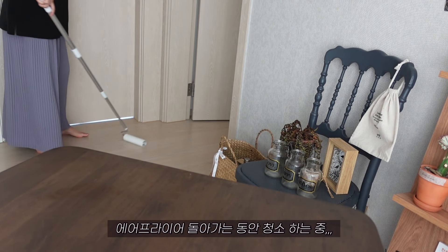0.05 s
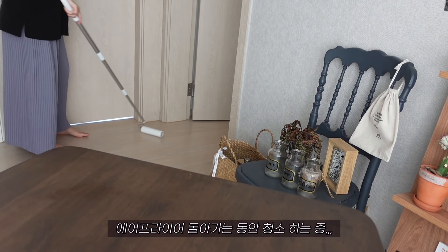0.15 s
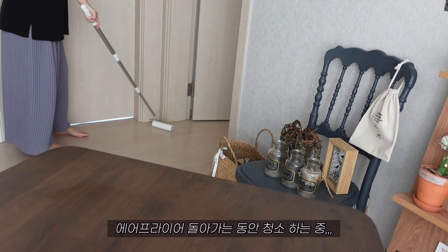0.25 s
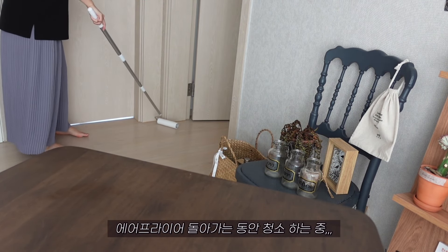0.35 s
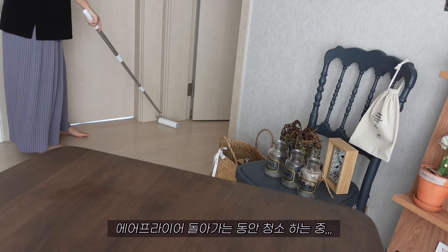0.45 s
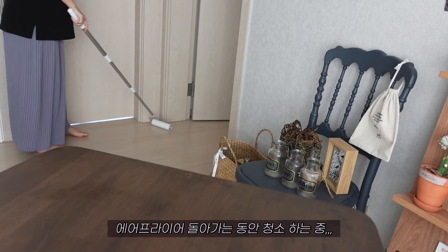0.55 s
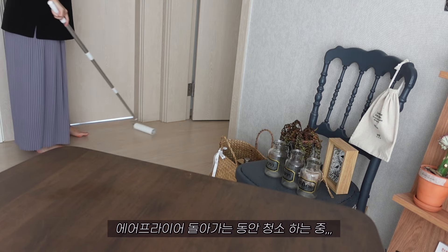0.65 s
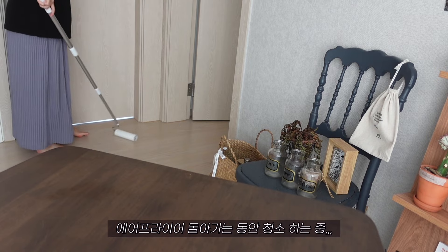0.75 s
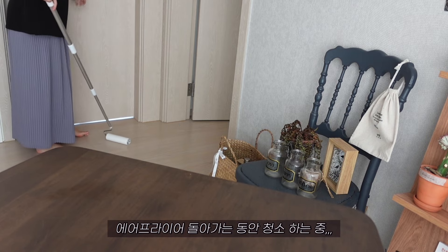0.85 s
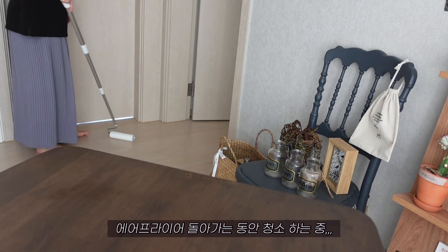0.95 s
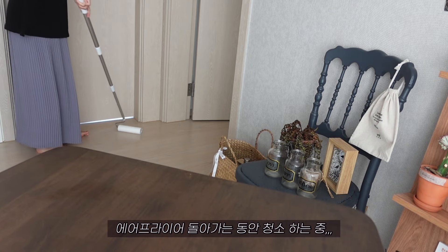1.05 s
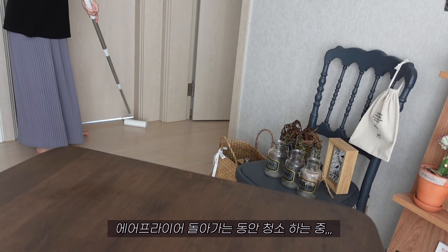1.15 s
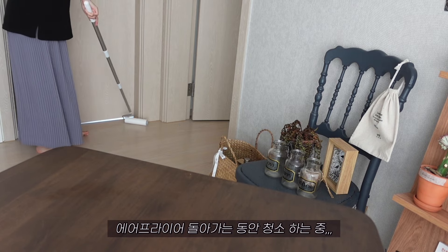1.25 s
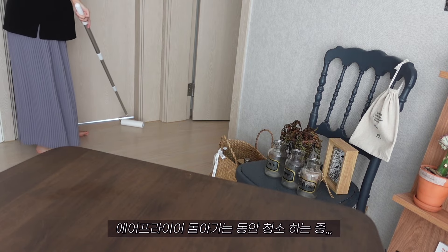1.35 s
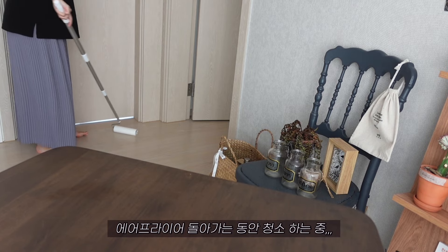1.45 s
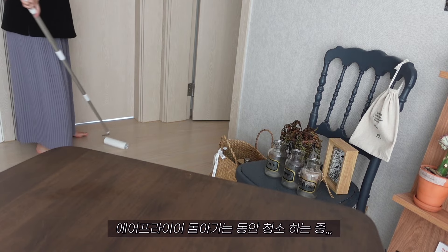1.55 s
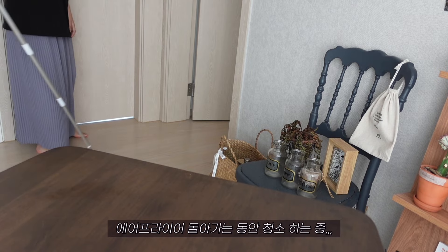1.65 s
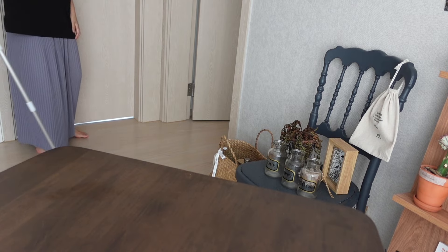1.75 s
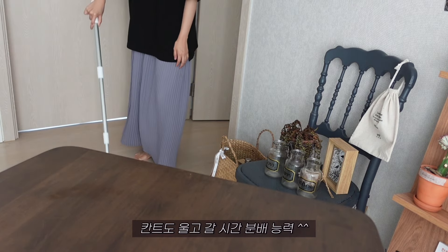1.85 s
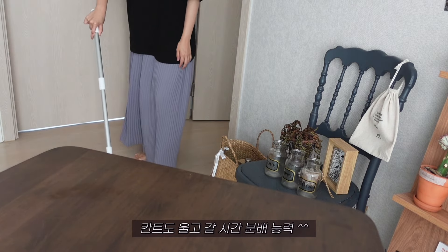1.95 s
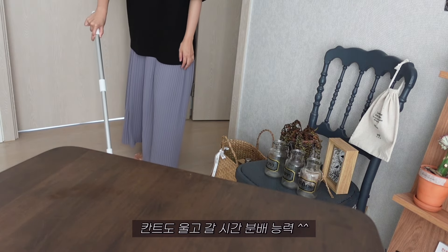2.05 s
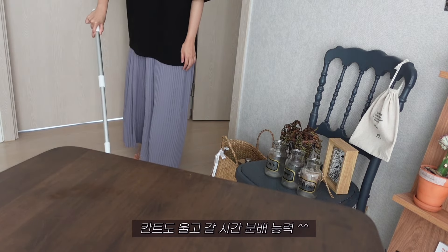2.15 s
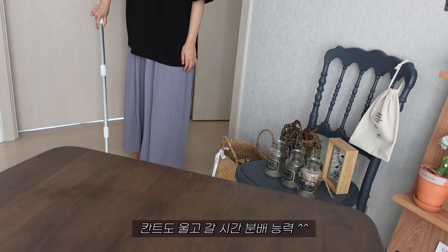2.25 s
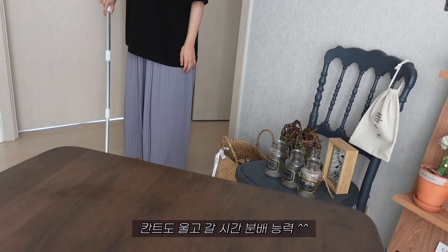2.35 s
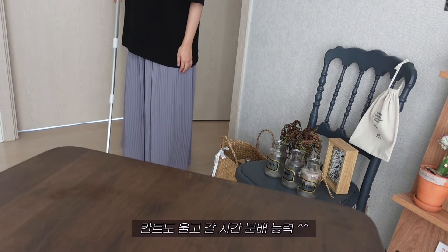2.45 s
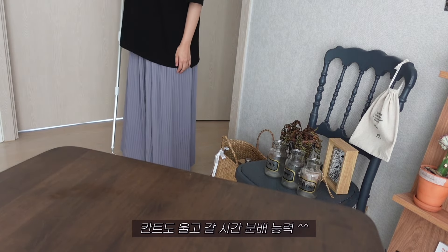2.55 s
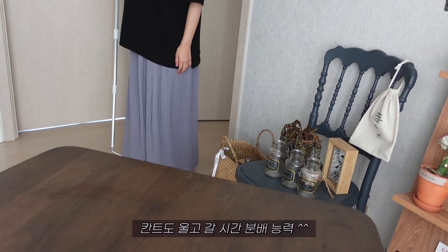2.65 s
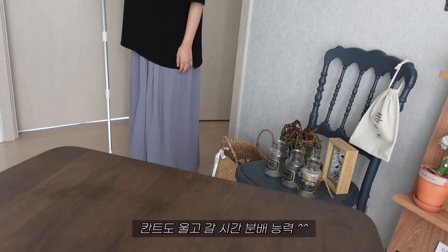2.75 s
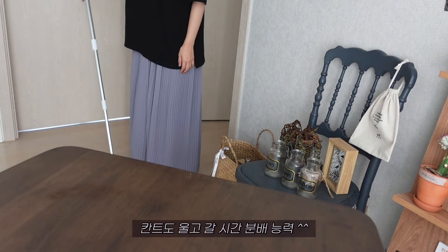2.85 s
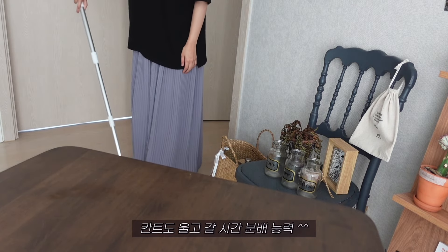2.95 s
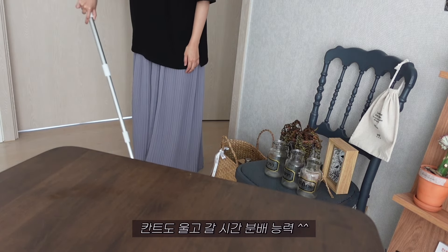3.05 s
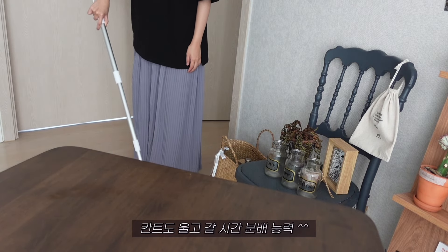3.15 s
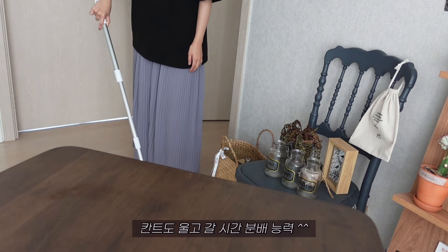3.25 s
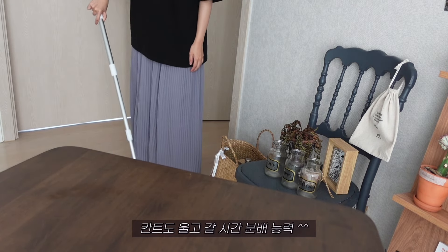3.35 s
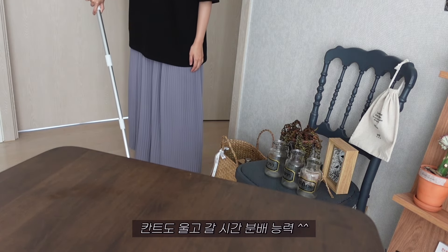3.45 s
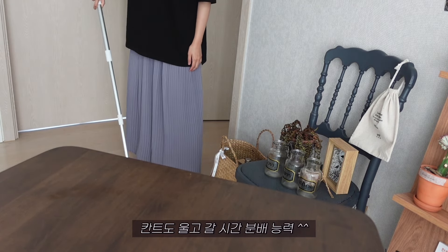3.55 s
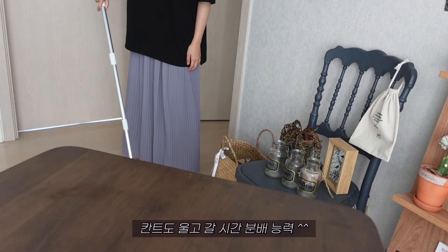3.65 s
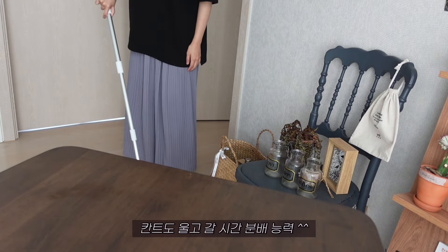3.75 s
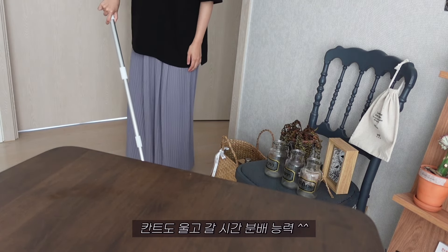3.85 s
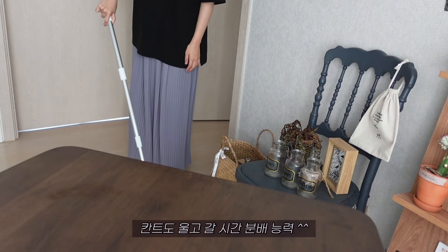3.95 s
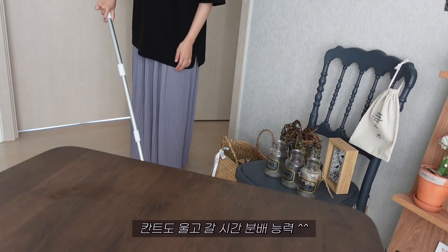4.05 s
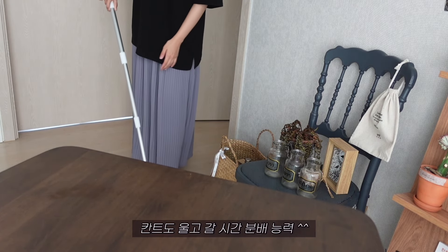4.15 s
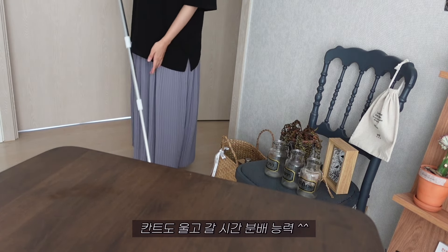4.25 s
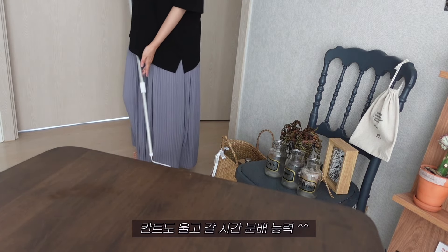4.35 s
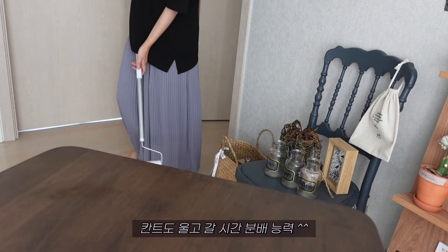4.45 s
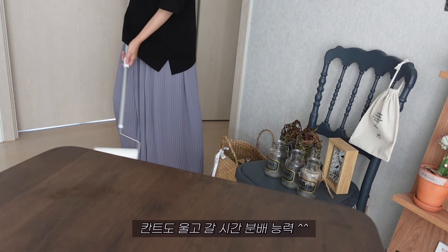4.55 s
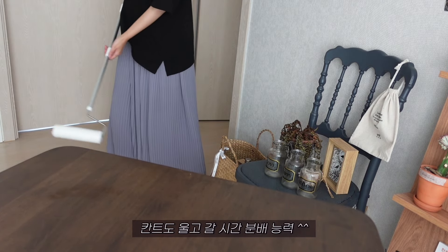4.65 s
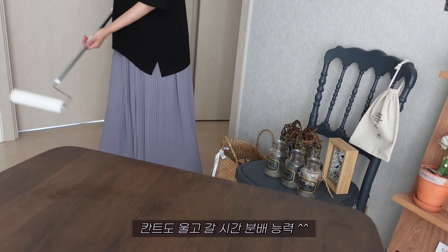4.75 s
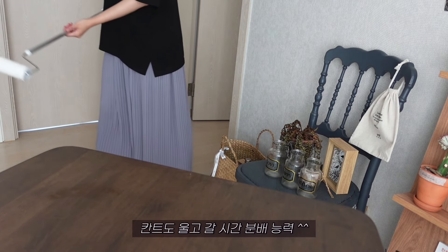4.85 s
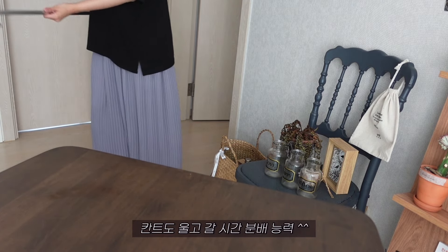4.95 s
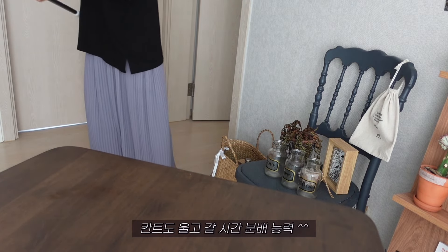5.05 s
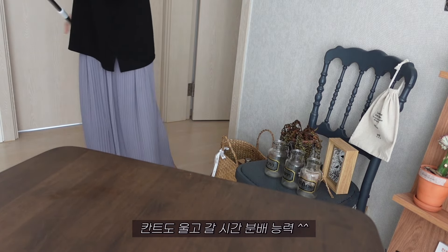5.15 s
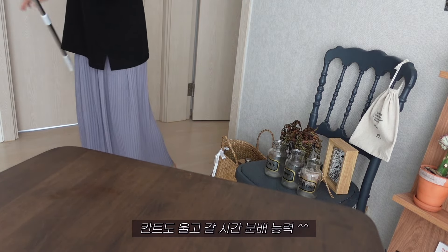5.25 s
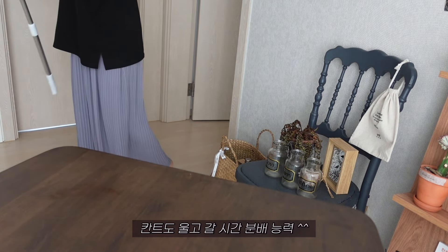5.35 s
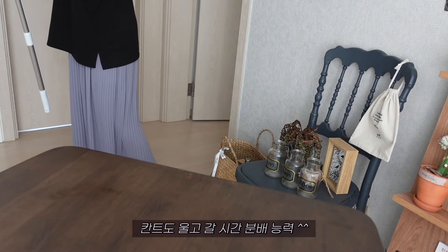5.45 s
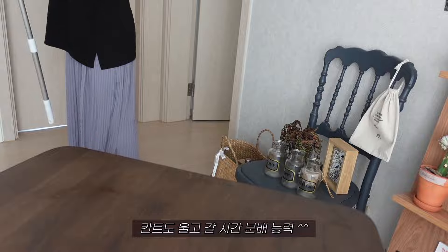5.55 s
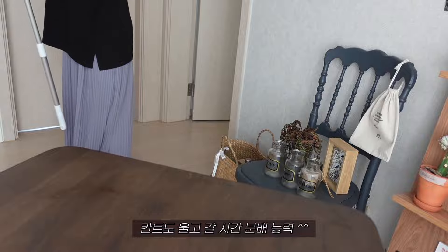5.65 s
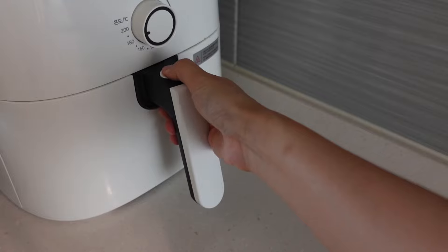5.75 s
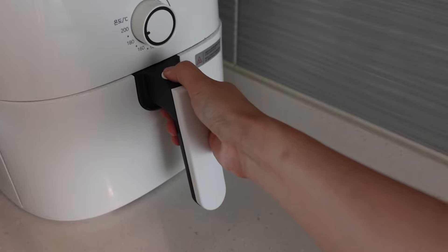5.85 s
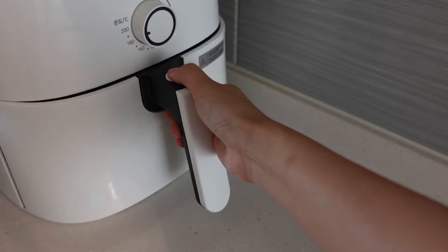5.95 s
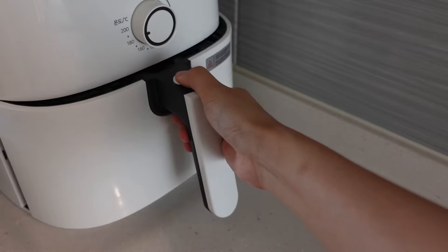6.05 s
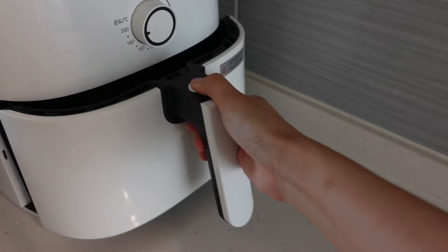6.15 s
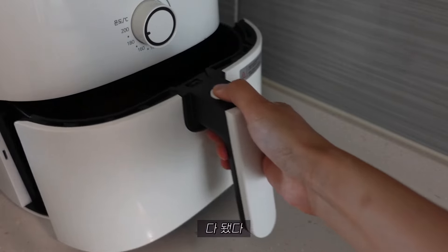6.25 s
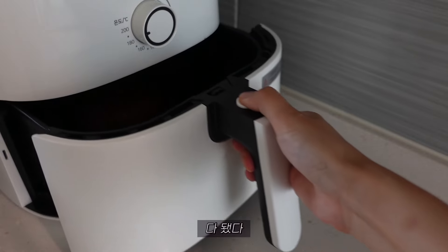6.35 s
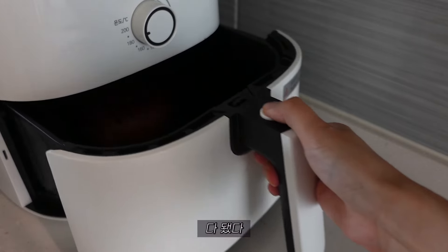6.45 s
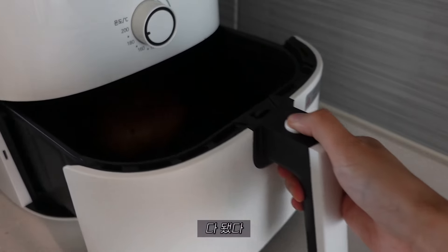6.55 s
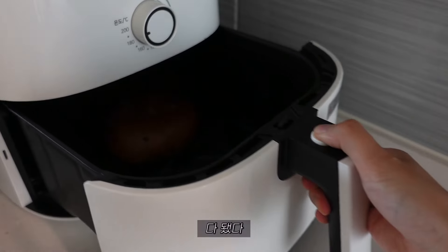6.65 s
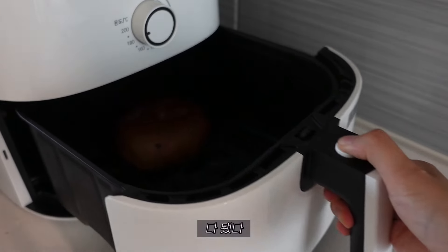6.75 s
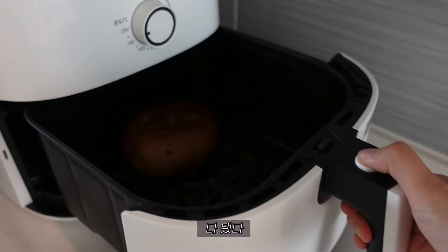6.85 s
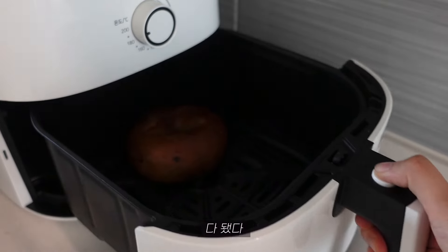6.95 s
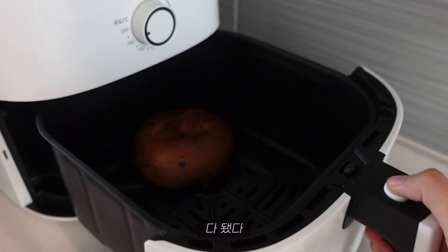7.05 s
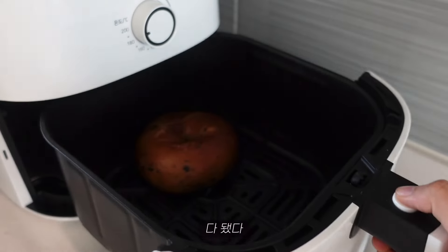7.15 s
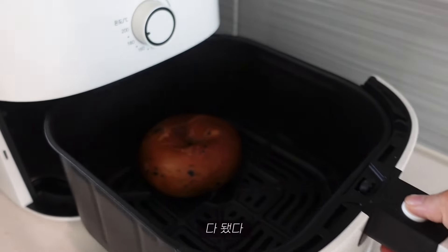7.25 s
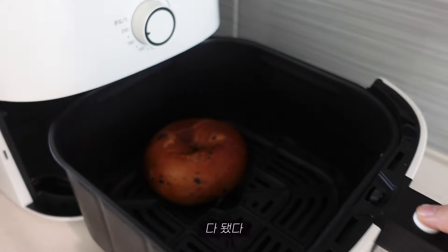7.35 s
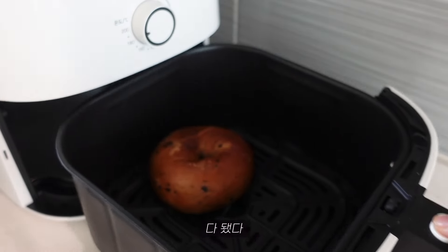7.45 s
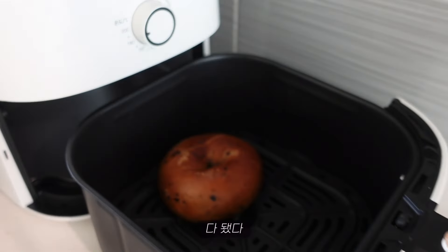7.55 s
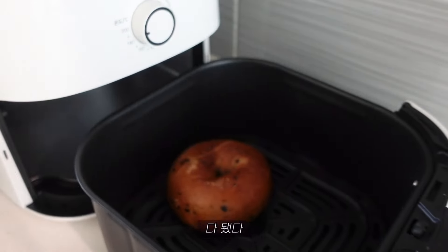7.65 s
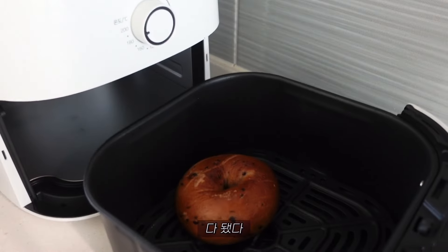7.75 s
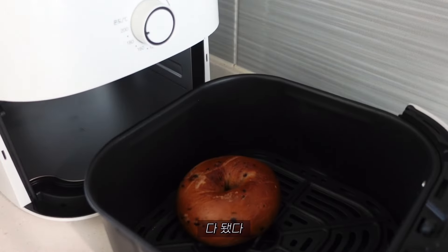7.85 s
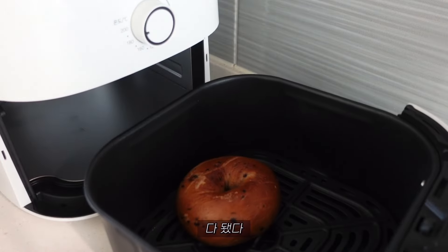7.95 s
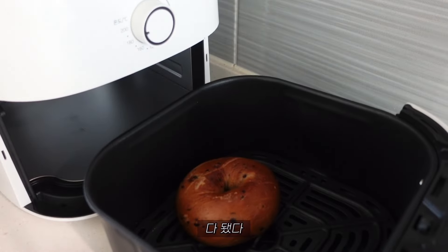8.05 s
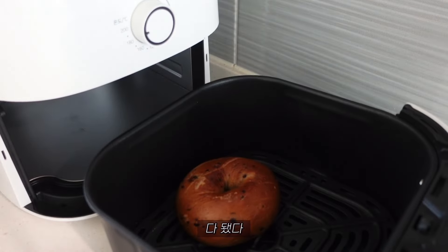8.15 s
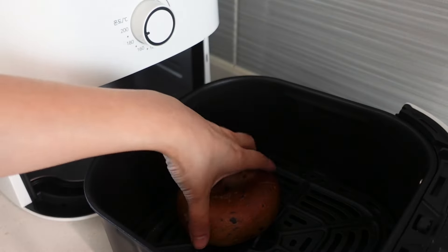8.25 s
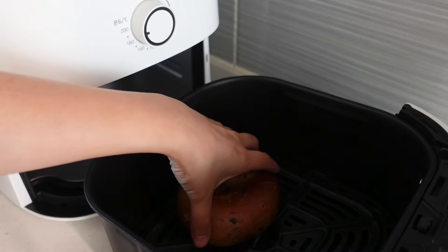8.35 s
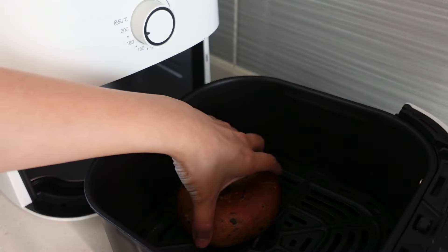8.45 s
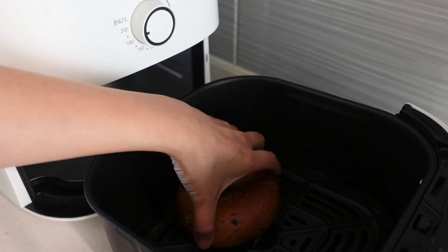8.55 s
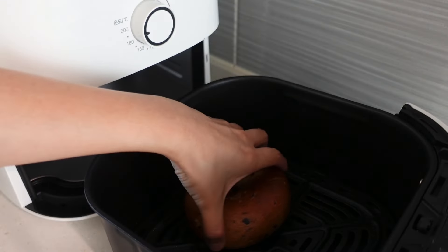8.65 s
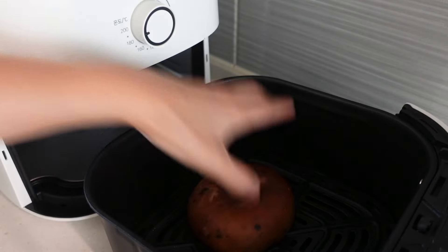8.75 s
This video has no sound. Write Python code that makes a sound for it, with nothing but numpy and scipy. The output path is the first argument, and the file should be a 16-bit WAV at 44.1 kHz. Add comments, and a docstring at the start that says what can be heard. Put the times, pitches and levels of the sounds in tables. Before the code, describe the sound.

From 0 to about 4 s a sticky roller on a pole works over a hard floor in irregular short strokes: dry rattle, small axle squeaks, bright peeling hiss and light taps, sharpest around 2.2 and 3 to 3.5 s, with soft foot thumps. A low fan hum lies behind, stepping up slightly near 1.8 s. Activity thins after 4 s, with one small tap near 4.5 and a faint one at 5.4. At 5.7 s the hum cuts off to quiet kitchen air. A latch clunks at 5.8; from 6.2 to 6.7 a plastic basket knocks and scrapes out with a hollow ring, eases off, then bumps heavily at 7.4 to 7.75 and settles; a dull knock follows at 8.1. From 8.3 fingertips rustle and crackle a crust, thin wires ring at 8.6, and a scuffing knock lands at 8.8. Close, lightly reverberant stereo.

```python
"""A sticky roller on a pole is pushed over a hard floor: shaped friction noise rattles, squeaks and peels; bursts tap.
Next door an air fryer hums: steady sine lines, stepping up once, over shaped fan noise.
A cut to the kitchen counter: the basket's ringing modes, struck by knocks or rubbed by stick-slip noise,
make the latch clunk and the basket scrape out of its housing, bump and settle.
After a second cut fingers rustle and crackle a bread roll, which scuffs a thinly ringing wire grid."""
import sys
import numpy as np
from scipy import signal
from scipy.fft import rfft, irfft
from scipy.io import wavfile
from scipy.ndimage import uniform_filter1d

SR = 44100
rng = np.random.default_rng(int(sys.argv[2]) if len(sys.argv) > 2 else 0)


def generate_wav(sig):
    """Save sig (samples, or channels by samples) to the path in sys.argv[1] as 16-bit PCM at SR."""
    pcm = np.round(np.clip(np.atleast_2d(sig).T, -1, 1) * 32767).astype(np.int16)
    wavfile.write(sys.argv[1], SR, pcm)


N = 388521

# blows on the basket: (time [s], level [dB], pitch rung most [Hz], boom over level [dB], boom pitch [Hz],
# crack over level [dB], ring length [share of t60], lift of nearest mode [dB],
# dull body pitch [Hz], body over level [dB], body t60 [s])
KNOCKS = [(5.788, -11, 458, -1, 150, -13, 0.19, 7, 420, -5, 0.07),
          (5.835, -36, 509, -12, 148, 5, 0.38, -1, 2020, 0, 0.066),
          (5.891, -22.5, 820, -4.5, 221, 0, 0.23, 20, 2000, -17, 0.044),
          (6.192, -15.5, 1040, -11, 237, -14, .9, 6, 239, -3, 0.14),
          (6.234, -21, 1500, -13, 230, -12, .4, 3, 1300, -5, .06),
          (6.251, -13.5, 2090, -12, 231, -15, 0.55, 9.5, 2100, -10, .12),
          (6.3, -18, 2090, -26, 194, -4.5, .43, 8, 1650, -0.5, 0.091),
          (6.345, -17.5, 1040, -12, 369, -22, 0.48, 12, 1900, -4, 0.083),
          (6.408, -11, 434, -11, 221, -16, 0.6, 6, 221, 1, 0.17),
          (6.457, -9.5, 990, -30, 225, -5.5, 0.42, 6, 600, -5.5, 0.095),
          (6.567, -23.5, 982, -8, 230, -7, .4, 5, 1498, -6, 0.054),
          (6.628, -25, 1010, -15, 225, -11, .4, 5, 1597, -1, .07),
          (6.684, -27.5, 1050, -19, 224, -7, .4, 11, 2000, -4, 0.11),
          (7.341, -34, 636, -21.5, 266, -32, .84, 18.5, 620, -4, 0.17),
          (7.378, -42.5, 667, -19, 266, 2.5, .3, 1.5, 6520, 2, .05),
          (7.4, -11, 950, -10.5, 262, -4.5, .42, 6, 3300, -8, 0.13),
          (7.457, -7.5, 650, -10, 257, -15.5, 0.5, 4, 400, -7.5, .11),
          (7.556, -10.5, 856, -5.5, 260, -3, 0.42, -1.5, 4900, -7, .1),
          (7.585, -15, 1050, -12, 230, -4, .4, -0.5, 5100, -6, 0.091),
          (7.619, -13.5, 1040, -3.5, 155, -3, .41, 6, 1900, -8, .1),
          (7.655, -14.5, 1050, -8, 199, -4.5, .4, 2.5, 3030, -7, 0.064),
          (7.7435, -7.5, 595, -16.5, 388.5, -19, 1.05, 7.5, 900, -4.5, 0.22),
          (8.082, -19, 947, -4, 203.6, -28, 0.62, 14, 620, 0, 0.19),
          (8.726, -46, 1500, -20, 378, -2, .3, -1, 1500, 5.5, .06),
          (8.745, -38, 544, -22, 378, 3, 0.51, 3, 4860, 17.5, 0.043),
          (8.763, -33.5, 1030, 1, 219, -7, 0.35, 8, 7500, -4, .06),
          (8.799, -14, 970, -13, 253, -10, .45, 6.5, 4270, -6, .06)]
# modes of basket and housing: (pitch [Hz], relative level [dB], t60 [s])
BASKET_MODES = [(109, -13, 0.098), (146, -2, 0.6), (218.7, -5.5, 0.31), (234, 6, 0.13), (356.4, 3.5, 0.14),
                (461, -3.5, 0.15), (542.5, -9.5, 0.4), (581.6, -3.5, 0.25), (615.6, -6.5, 0.27),
                (647, -7.5, 0.29), (713, -9.5, 0.27), (855.4, -3, 0.18), (946.3, -3.5, 0.26),
                (1051, -2, 0.11), (1270, -5.5, 0.32), (1410, -3, 0.1), (1603, -1.5, 0.13), (1670, -5, 0.17),
                (1894, 0, 0.12), (2083, 0.5, 0.075), (2300, -4, 0.17), (2570, -11, 0.44), (2690, -12, 0.36),
                (2755, -13.5, 0.22), (3085, -5, 0.12), (3370, -3, 0.079), (3730, -8.5, 0.082),
                (4134, -13.5, 0.2), (4290, -14, 0.19), (4680, -13.5, 0.32), (5040, -15.5, .25),
                (5270, -17, 0.21), (6460, -18.5, .15), (7730, -23, 0.15)]


def undb(db):
    """Decibels to amplitude."""
    return np.exp(np.asarray(db) * np.log(10) / 20)


def unit(x):
    """Scale to rms 1."""
    return x / np.sqrt(np.mean(x ** 2))


def columns(table):
    """Time curves joined by straight lines, one array per column."""
    time_s, *rest = np.transpose(table)
    return [np.interp(np.arange(N) / SR, time_s, column) for column in rest]


def colour(x, points):
    """Shape a spectrum by (pitch [Hz], gain [dB]) points on a log frequency axis."""
    hz, db = np.transpose(points)
    bin_hz = np.arange(N // 2 + 1) * SR / N + 1
    gain = undb(np.interp(np.log(bin_hz), np.log(hz), db))
    return irfft(rfft(x) * gain, N)


def band(x, lo_hz, hi_hz):
    """Band-pass filter."""
    return signal.sosfilt(signal.butter(2, [lo_hz, hi_hz], "band", fs=SR, output="sos"), x)


def ring(x, hz, width_hz):
    """One resonance, gain 1 at its centre."""
    return signal.lfilter(*signal.iirpeak(hz, hz / width_hz, SR), x)


def walk(rate_hz):
    """Random levels, rate_hz new ones a second, joined by ramps; spread near 1."""
    k = int(SR / rate_hz)
    held = np.repeat(rng.standard_normal(N // k + 1), k)
    return uniform_filter1d(held, k)[:N]


def wander(x, rate_hz, share):
    """Varying delay: pitch steps up and down by about this share, rate_hz times a second."""
    n = np.arange(N)
    return np.interp(n + share * SR / rate_hz * walk(rate_hz), n, x)


def grit(slips_per_s, scatter_db, share):
    """Fine friction noise with sparse slips of uneven but bounded size on top."""
    size_db = scatter_db * np.minimum(rng.exponential(size=N), 3)
    slips = (rng.random(N) < slips_per_s / SR) * undb(size_db) * rng.standard_normal(N)
    return unit(rng.standard_normal(N) + share * unit(slips))


def narrow(hz, width_hz):
    """Noise in a narrow band around a moving pitch."""
    noise = rng.standard_normal(len(hz)) + 1j * rng.standard_normal(len(hz))
    drive = signal.lfilter([1], [1, -np.exp(-np.pi * width_hz / SR)], noise)
    return unit(np.real(drive * np.exp(2j * np.pi * np.cumsum(hz) / SR)))


def swells(times_s, rises_s, holds_s, levels_db, sag_db_s, fall_db_s):
    """Summed envelopes: 30 dB of climb per run-up time, a hold that sags, a steady fall."""
    column = lambda v: np.reshape(v, (-1, 1))
    t = np.arange(0, N + 32, 32) / SR - column(times_s)  # every 32nd sample
    rise, hold = column(np.maximum(rises_s, .001)), column(holds_s)
    db = 30 * np.minimum(t, 0) / rise
    db = db - sag_db_s * np.clip(t, 0, hold)
    db = db - column(fall_db_s) * np.maximum(t - hold, 0)
    gain = np.sqrt(np.sum(undb(db + column(levels_db)) ** 2, axis=0))
    return np.interp(np.arange(N), np.arange(len(gain)) * 32, gain)


def lift_off(times_s, lead_s, depth):
    """Rubbing contact loosens just before a bump and returns with it."""
    gain, n = np.ones(N), int(lead_s * SR)
    for s in times_s:
        i = int(s * SR)
        gain[i - n:i] *= 1 - depth * np.arange(n) / n
    return gain


def room(x, t60_low_s, t60_high_s, wet_db):
    """Dry sound plus a noise tail whose treble dies first."""
    t = np.arange(SR) / SR
    noise = rng.standard_normal((2, SR))
    low = band(noise[0], 51, 2200) * undb(-60 * t / t60_low_s)
    high = band(noise[1], 1800, 19845) * undb(-60 * t / t60_high_s)
    tail = (low + high) * np.minimum(t / 0.0012, 1)
    return x + undb(wet_db) * signal.fftconvolve(x, tail / np.sqrt(np.sum(tail ** 2)))[:N]


def spread(mid, size=4096):
    """Side signal from early echoes: overlapping blocks, each with its own random echo pattern."""
    hop, lag = size // 2, np.arange(SR // 25)
    starts = np.arange(-hop, N, hop)
    padded, side = np.pad(mid, size), np.zeros(N + 4 * size)
    echo = rng.standard_normal((len(starts), len(lag))) * undb(-60 * lag / SR / 0.035)
    echo = echo / np.sqrt(np.sum(echo ** 2, axis=1, keepdims=True))
    window = np.sin(np.pi * np.arange(size) / size)
    blocks = padded[starts[:, None] + size + np.arange(size)] * window
    for start, piece in zip(starts, signal.fftconvolve(blocks, echo, axes=1)):
        side[start + size:start + size + len(piece)] += piece
    return side[size:size + N]


def add(out, s, piece):
    """Mix a piece in at s seconds."""
    i = int(s * SR)
    out[i:i + len(piece)] += piece[:N - i]


def air(points, db):
    """Steady shaped noise whose level drifts a little."""
    return unit(colour(rng.standard_normal(N), points)) * undb(db + 0.38 * walk(6.7))


def hum():
    """Fan and motor sine lines, slightly unsteady; pitch and level step up with the motor."""
    # lines at full speed: (pitch [Hz], rms level [dB])
    hum_lines = [(269.2, -63), (307.5, -53.5), (694.4, -69.5), (731, -74)]
    speed_up_s, slow_share, slow_db = 1.83, .927, -2
    slow = np.arange(N) / SR < speed_up_s
    turns = np.cumsum(np.where(slow, slow_share, 1)) / SR
    out = np.zeros(N)
    for hz, db in hum_lines:
        gain = np.sqrt(2) * undb(db + slow_db * slow + 0.8 * walk(5.0))
        out += gain * np.sin(2 * np.pi * hz * turns + 0.13 * walk(2.8))
    return out


def roller():
    """Friction noise rattles through pole modes, the axle squeaks, peeling glue hisses, the roll taps."""
    # strokes: (full speed at [s], run-up [s], hold [s], rattle level [dB], axle squeak over it [dB],
    # floor rumble over it [dB])
    stroke_rows = [(0.06, 0.17, 0.07, -48, -6, -5), (0.183, 0.056, 0.1, -47.5, -2, -5),
                   (0.758, 0.19, 0.08, -43, -6.5, -21), (1.061, 0.11, 0.21, -51, 0.5, -4),
                   (1.59, 0.42, 0.11, -41.5, -13, -13), (1.694, 0.077, 0.18, -38, -8, -9.5),
                   (1.967, .05, 0.083, -47, -4, -5), (2.212, 0.011, 0.25, -39.5, -11, -12),
                   (2.493, 0.091, 0.06, -41.5, -2, -4), (2.811, 0.08, 0.14, -52, -15, -4.5),
                   (2.97, 0.11, 0.088, -34.5, -10, -10), (3.03, .03, 0.15, -41.5, -2, -8.5),
                   (3.373, 0.0092, 0.086, -33, -12, -9.5), (3.732, 0.025, 0.035, -42.5, -5.5, -14),
                   (3.888, .02, 0.039, -54, -5, -10), (4.477, .012, 0.021, -46.5, -3.5, 0),
                   (4.65, .1, 0.42, -69, -10, -3), (5.38, 0.067, .02, -70, -15, -1)]
    # taps of the roll: (time [s], level [dB], pitch rung most [Hz])
    tap_rows = [(0.179, -34, 2400), (0.7194, -40, 2480), (0.7416, -31, 2200), (0.7922, -21.5, 2400),
                (1.211, -40, 2400), (1.587, -26.5, 3360), (1.695, -22.5, 3640), (1.809, -24, 3300),
                (1.848, -25.5, 1720), (2.2201, -14.5, 5030), (2.239, -28, 2070), (2.4266, -28, 2580),
                (2.5281, -24, 1590), (2.9634, -20.5, 2140), (2.981, -20.5, 3470), (3.025, -26.5, 2530),
                (3.2154, -25, 3680), (3.376, -22, 1770), (3.463, -17, 3740), (3.7275, -48, 2160),
                (3.7665, -26, 2170), (3.907, -34.5, 2390), (4.475, -30.5, 4330), (5.381, -55, 2118)]
    # pole modes: (pitch [Hz], width [Hz], relative level [dB])
    pole_modes = [(512, 55, 12), (844, 53, 1), (2130, 280, 3.5), (2444, 100, 7.5), (2930, 200, -1.5),
                  (3360, 92, 4), (4700, 160, -8.5), (5090, 170, 6.5), (6410, 200, 1.5)]
    # rattle spectrum: (pitch [Hz], relative density [dB])
    rattle_curve = [(500, -53.5), (900, -19), (1500, -0.5), (2500, -3.5), (4000, -6.5), (5000, -13.5),
                    (9000, -17.5), (14000, -60)]
    # axle resonance: (pitch [Hz], width [Hz])
    axle_mode = (1400, 55)
    # glue letting go of the floor: (time [s], run-up [s], hold [s], hiss level [dB], opening tick over it [dB])
    peel_rows = [(0.005, 0.056, 0.17, -38.5, -7), (0.227, .03, 0.067, -51, -9),
                 (0.3445, .005, 0.026, -48.5, 11), (0.389, .005, 0.027, -48.5, 10),
                 (0.44, 0.0057, 0.023, -61, 18), (0.507, .005, 0.046, -53, 19),
                 (0.582, 0.067, 0.094, -46.5, 1), (0.708, .005, .02, -43.5, 0),
                 (0.792, 0.052, 0.084, -39.5, -7), (0.941, .015, 0.075, -42, 12.5),
                 (1.029, 0.012, 0.076, -40.5, 7), (1.272, 0.083, 0.036, -43, 0),
                 (1.412, 0.074, 0.15, -36.5, 2), (1.574, 0.054, 0.21, -32.5, -9),
                 (1.95, .05, 0.14, -56, -7), (2.219, 0.016, 0.045, -35.5, 3),
                 (2.318, 0.089, 0.095, -30.5, -9), (2.432, 0.041, 0.15, -39, -4),
                 (2.719, .005, 0.043, -50, 13), (2.776, .005, 0.028, -39, 0), (2.817, .01, 0.22, -40, 8),
                 (3.18, 0.058, 0.025, -48.5, -9), (3.396, .01, 0.21, -45.5, -5),
                 (3.628, .015, 0.04, -42, 5), (3.716, .01, 0.054, -41, -2), (3.907, 0.045, 0.032, -46, -11),
                 (4.24, .01, .02, -73, 0), (4.4, .08, 0.055, -64.5, -9), (4.468, .005, 0.015, -51.5, 2),
                 (4.626, .05, 0.43, -63, -9), (5.377, .03, 0.018, -61.5, 0)]
    # peel hiss spectrum: (pitch [Hz], relative density [dB])
    peel_curve = [(1760, -55), (3000, -8.5), (4350, -6.5), (5250, -3.5), (5560, -1.5), (11000, -1.5),
                  (14300, -5), (16000, 0)]
    stroke_sag_db_s, stroke_fall_db_s = 1, 143
    peel_sag_db_s, peel_fall_db_s = 5, 144.5
    shake_db, shake_fall_db_s = -12, 235  # a tap shakes the roll for a moment
    tap_t60_s, tick_t60_s, tap_treble_db = 0.12, 0.0804, -27

    s, rise, hold, level_db, squeak_db, rumble_db = np.transpose(stroke_rows)
    stroke = lambda db: swells(s, rise, hold, db, stroke_sag_db_s, stroke_fall_db_s)
    tap_s, tap_db, _ = np.transpose(tap_rows)
    shaken = swells(tap_s, 0.0069, 0, tap_db + shake_db, 0, shake_fall_db_s)
    shake = grit(600, 4.0, 0.49)
    # the grip on the pole shifts, so each of its modes comes and goes
    pole = sum(undb(db + 4.5 * walk(8)) * ring(shake, hz, width) for hz, width, db in pole_modes)
    rattle = unit(unit(colour(shake, rattle_curve)) + undb(-5.0) * unit(pole))
    squeak = unit(wander(ring(shake, *axle_mode), 7.0, .008) * undb(2.5 * walk(12)))
    rumble = unit(band(shake, 216, 1090))
    strokes = np.hypot(stroke(level_db), shaken) * rattle
    strokes += stroke(level_db + squeak_db) * squeak
    strokes += np.hypot(stroke(level_db + rumble_db), undb(-12.0) * shaken) * rumble

    peel_s, peel_rise, peel_hold, peel_db, tick_db = np.transpose(peel_rows)
    peel = unit(colour(grit(1500, 2.6, 0.62), peel_curve)) * undb(2.63 * walk(24.41))
    peel = peel * swells(peel_s, peel_rise, peel_hold, peel_db, peel_sag_db_s, peel_fall_db_s)

    taps, t = np.zeros(N), np.arange(SR // 5) / SR
    tick = lambda db, noise: band(undb(db - 60 * t / tick_t60_s) * noise, 7600, 14000)
    tap_noise = rng.standard_normal((len(tap_rows), 2, len(t)))
    for (at_s, db, spot_hz), noise in zip(tap_rows, tap_noise):
        blow = undb(db - 60 * t / tap_t60_s) * np.minimum(t / 0.00026, 1) * noise[0]
        body = undb(-7.0) * band(blow, 1300, 4160) + undb(6.0) * ring(blow, spot_hz, 260.0)
        add(taps, at_s, body + tick(db + tap_treble_db, noise[1]))
    tick_noise = rng.standard_normal((len(peel_rows), len(t)))
    for at_s, db, noise in zip(peel_s, peel_db + tick_db, tick_noise):
        add(taps, at_s, tick(db, noise))
    return room((strokes + peel) * lift_off(tap_s, 0.034, 0.053) + taps, 0.72, 0.4, -11.0)


def steps(table, t60_s):
    """Soft thumps through floor or counter: decaying sines with a rounded onset."""
    out, t = np.zeros(N), np.arange(SR // 4) / SR
    onset = np.sin(np.pi / 2 * np.minimum(t / 0.025, 1))
    for s, db, hz in table:
        add(out, s, undb(db - 60 * t / t60_s) * onset * np.sin(2 * np.pi * hz * t))
    return out


def slide():
    """Stick-slip along the rails drives the basket modes; low, middle and upper modes follow the grip."""
    # basket sliding out, dragged over the counter, then a scuff, one list each: (time [s], scrape level [dB],
    # boom over it [dB], upper ring over it [dB], hiss over it [dB])
    slide_rows = [
        [(5.76, -67, 18, 13, -8), (5.82, -59.5, -3, 9, -3), (6.03, -52.5, 8, 0.5, -3.5),
         (6.18, -41.5, 5, 3.5, -7.5), (6.28, -42, -6, 8.5, 5.5), (6.37, -39.5, -8, 3.5, -3),
         (6.44, -35.5, 5, 4.5, -10), (6.55, -47, 3, 7.5, 4), (6.72, -43.5, -4.5, 7.5, -1),
         (7.02, -48, -8.5, -1, -13.5), (7.29, -53.5, -6.5, -7.5, -7.5)],
        [(7.345, -41, -6, -10.5, -26.5), (7.39, -37, -1.5, -13.5, -26), (7.53, -44.5, 5.5, 0.5, -26),
         (7.565, -34, -1, 0.5, 0), (7.59, -25.5, -7, 1, 1), (7.63, -28.5, -10.5, 6, 3),
         (7.66, -40, -13, 6, -11), (7.73, -37.5, 4, 2, -22), (7.8, -35, -7, -3, -36),
         (7.95, -82, -1.5, -2, -16)],
        [(8.72, -81, 0, 8, 14), (8.77, -44, 2, 2, 15.5), (8.81, -28, -1, -2, -14)],
    ]
    # unpitched share of the scrape: (boom [dB], middle [dB], upper ring [dB], hiss [dB])
    broad_shares = (-10, -8, -4, 3)
    jolt_db, jolt_fall_db_s = -16.5, 225  # a knock leaves the basket chattering
    jolt_share = 0.4  # blows with a shorter ring share chatter shorter too

    level_db, boom_db, upper_db, hiss_db = columns(sum(slide_rows, []))
    rub = grit(1200, 2.5, 0.4) * undb(.8 * walk(40) + 1.2 * walk(120))
    groups = [np.zeros(N) for _ in range(4)]
    for hz, db, t60 in BASKET_MODES:
        # pressed on the rails the walls are damped (wider peaks);
        # the moving contact shifts the modes and favours now one, now another
        gain = undb(db + 3.5 * walk(12)) * np.sqrt(t60)
        mode = wander(ring(rub, hz, 4.5 / t60 + .004 * hz), 6, .006)
        groups[np.searchsorted([400, 1200, 4000], hz)] += gain * mode
    edges_hz = [(130, 540), (400, 1180), (1200, 5900), (4000, 10500)]
    broad = [band(rub, *edge) for edge in edges_hz]
    boom, mid, upper, hiss = (unit(unit(g) + undb(db) * unit(b)) for g, b, db in zip(groups, broad, broad_shares))

    t = np.arange(N) / SR
    moving = sum((t > rows[0][0]) & (t < rows[-1][0] + .09) for rows in slide_rows) > 0
    scrape = mid + undb(boom_db) * boom + undb(upper_db) * upper + undb(hiss_db) * hiss
    scrape = moving * undb(level_db) * scrape

    s, knock_db, spot_hz, knock_boom_db, _, crack_db, share, *_ = np.transpose(KNOCKS)
    fall_db_s = jolt_fall_db_s / np.clip(share, .1, jolt_share) * jolt_share
    jolt = lambda db: swells(s + 0.0023, 0.0042, 0, knock_db + jolt_db + db, 0, fall_db_s)
    # the chatter keeps the pitch of the struck spot
    spot, since = np.zeros(N), t[:SR // 4]
    for at_s, db, hz, fall in zip(s, knock_db, spot_hz, fall_db_s):
        drive = np.resize((mid + upper)[int(at_s * SR):], len(since))
        piece = unit(ring(drive, hz, 0.4 * hz))
        add(spot, at_s, piece * np.minimum(since / 0.0055, 1) * undb(db + jolt_db - fall * since))
    chatter = jolt(knock_boom_db + 3.5) * boom + jolt(crack_db) * upper + jolt(crack_db - 19.0) * hiss
    return scrape + spot + chatter


def knocks():
    """Each blow rings all modes, most those near its spot, plus a slap, a dull body and a short crack."""
    treble_share = 0.52  # ring share limit above 2500 Hz
    body_width, detune = 0.35, 0.0065  # shares of the pitch
    dull_share = 0.16  # of a negative crack level, lost per octave above the spot
    contact_s, contact_s_per_db = 0.00089, 0.01  # onset lengthens with the crack level

    out, t = np.zeros(N), np.arange(SR // 3) / SR
    hz, db, t60 = np.transpose(BASKET_MODES)[:, :, None]
    chance = rng.standard_normal((len(KNOCKS), 2, len(BASKET_MODES), 1))
    for row, (size, shift) in zip(KNOCKS, chance):
        s, level_db, spot_hz, boom_db, boom_hz, crack_db, share, lift_db, body_hz, body_db, body_t60 = row
        low_db = boom_db + 5.0 - 27.0 * np.abs(np.log2(hz / boom_hz))
        octaves = np.log2(hz / spot_hz)
        mid_db = -6.0 - 1.7 * np.abs(octaves)
        mid_db = mid_db + dull_share * min(crack_db, 0) * np.maximum(octaves, 0)
        mid_db = mid_db + lift_db * np.exp(-(octaves / 0.077) ** 2)
        weight_db = np.where(hz < 400, low_db, np.where(hz > 2500, crack_db + 0.5, mid_db))
        mode_share = np.where(hz > 2500, min(share, treble_share), share)
        mode_t60 = t60 * np.maximum(mode_share, .1)
        modes = undb(db + weight_db + size - 60 * t / mode_t60)
        modes = modes * np.sin(2 * np.pi * hz * (1 + detune * shift) * t)
        # throb of close mode pairs in the slightly lopsided basket
        modes = modes * (1 + .3 * np.cos(2 * np.pi * (27.0 + 9.5 * size) * t)) / 1.13
        modes = modes * np.minimum(t * hz / 0.54, 1)  # build-up over about half a cycle
        noise = rng.standard_normal(len(t))
        slap = ring(noise, spot_hz, 0.32 * spot_hz) * undb(-11.5 - 60 * t / 0.02)
        body = ring(ring(noise, body_hz, body_width * body_hz), body_hz, 2 * body_width * body_hz)
        body = unit(body) * undb(body_db - 60 * t / max(body_t60, .02)) * np.minimum(t / 0.0065, 1)
        crack = band(noise, 1500, 7300) * undb(crack_db + 1.0 - 60 * t / 0.06)
        click = band(noise, 1500, 8000) * undb(1.5 * crack_db + 0.5 - 60 * t / 0.008)
        onset = np.minimum(t / max(contact_s + contact_s_per_db * crack_db, .0003), 1)
        blow = onset * (modes.sum(axis=0) + slap + body + crack) + click
        add(out, s, undb(level_db - 4.5) * blow)
    return out


def hollow():
    """Narrow noise resonances of the housing, shifting with its opening, and brief gliding streaks."""
    # hollow singing as the basket leaves: (time [s], pitch [Hz], level [dB])
    hollow_rows = [(6.15, 1014, -68), (6.2, 1031, -45), (6.36, 1005, -37), (6.55, 990, -42),
                   (6.64, 960, -37), (6.7, 992, -34.5), (6.8, 1044, -46), (7.09, 1008, -46),
                   (7.27, 960, -59.5), (7.45, 967, -40.5), (7.54, 980, -42.5), (7.59, 1030, -22),
                   (7.66, 1019, -27.5), (7.72, 983, -45)]
    # upper resonances: (multiple of the pitch, level over it [dB])
    upper_parts = [(2.0, -18), (3.33, -10)]
    # scrape streaks: (start [s], end [s], start pitch [Hz], end pitch [Hz], level [dB])
    streak_rows = [(6.6, 6.92, 1700, 1900, -43), (6.64, 6.9, 2200, 2110, -46),
                   (6.68, 6.838, 3530, 4800, -46.5), (6.697, 6.836, 4500, 5200, -55),
                   (6.62, 6.74, 5260, 4900, -50.5), (6.55, 6.62, 4700, 4300, -53),
                   (6.66, 6.72, 2900, 3000, -51), (6.8, 7.05, 4100, 3600, -56.5),
                   (6.25, 6.32, 6500, 6520, -45)]
    hz, db = columns(hollow_rows)
    t = np.arange(N) / SR
    parts = [(0.99, 0.01)] + upper_parts
    out = sum(undb(part_db) * narrow(multiple * hz, 12) for multiple, part_db in parts)
    out = (t > hollow_rows[0][0]) * (t < hollow_rows[-1][0]) * undb(db) * out
    for start, end, start_hz, end_hz, level_db in streak_rows:
        n = int((end - start) * SR)
        streak = narrow(np.linspace(start_hz, end_hz, n), 70)
        add(out, start, undb(level_db) * np.sqrt(np.hanning(n)) * streak)
    return out


def grid():
    """Fingertip friction and crust crackles drive the thin modes of the wire grid; snapping wires ring."""
    # fingertip rustle: (time [s], relative level [dB])
    finger_rows = [(8.26, -85), (8.308, -66), (8.316, -83), (8.392, -71), (8.47, -88), (8.482, -59.5),
                   (8.578, -51), (8.624, -40.5), (8.708, -75), (8.74, -52)]
    # crust crackles: (time [s], relative level [dB])
    crust_rows = [(8.2983, -53.5), (8.38, -56.5), (8.4094, -58), (8.4797, -47), (8.4976, -44.5),
                  (8.531, -53.5), (8.5595, -48.5), (8.596, -39), (8.6187, -43), (8.7144, -45)]
    # wire grid modes: (pitch [Hz], relative level [dB], t60 [s])
    grid_modes = [(1000, 8.5, 0.046), (5870, -2, 0.1), (6450, -10, .15), (7130, 6, 0.2), (8450, 3, 0.06),
                  (10900, -7, .15), (12500, -11, .2), (13500, -9.5, .2), (15000, -11.5, .15)]
    # wires snapping free of the crust: (pitch [Hz], level [dB], t60 [s])
    pluck_modes = [(2860, -59, 1.3), (4750, -60, .35), (8400, -43, 0.17)]
    pluck_s = 8.612
    t = np.arange(N) / SR
    touching = (t > finger_rows[0][0]) * (t < finger_rows[-1][0])
    touch = touching * undb(columns(finger_rows)[0] - 6.5) * grit(810, 2.6, 0.47)
    crackles = rng.standard_normal((len(crust_rows), SR // 20))
    for (s, db), noise in zip(crust_rows, crackles):
        add(touch, s, undb(db - 8.5 - 60 * t[:len(noise)] / 0.04) * noise)
    wires = sum(undb(db) * ring(touch, hz, 2.6 / t60) * np.sqrt(t60) for hz, db, t60 in grid_modes)
    wires = undb(20.5) * wires
    since = t[:SR // 4]
    onset = np.minimum(since / 0.0075, 1)
    for hz, db, t60 in pluck_modes:
        add(wires, pluck_s, undb(db - 60 * since / t60) * onset * np.sin(2 * np.pi * hz * since))
    return band(touch, 2300, 19000) + wires


def scene():
    """Three moments cut together, each spread over two close microphones."""
    # jumps to another moment: (first [s], second [s])
    cut_times = (5.715, 8.232)
    # fryer fan spectrum: (pitch [Hz], relative density [dB])
    fan_curve = [(15, -87), (25, -40), (76, -25), (120, -17), (148, -0.5), (172, -7.5), (200, -4),
                 (232, -13.5), (260, -9.5), (309, -12), (451, -17), (560, -23), (641, -25), (714, -24.5),
                 (863, -29.5), (1230, -28.5), (1790, -36), (3250, -37.5), (16000, -51)]
    # kitchen air spectrum: (pitch [Hz], relative density [dB])
    kitchen_curve = [(15, -70), (25, -47), (60, -13), (145, 6), (317, -5.5), (714, -10.5), (2610, -22.5),
                     (7710, -28.5), (8590, -29.5), (14800, -31), (16000, -22)]
    # bare feet and the roll landing: (time [s], level [dB], pitch [Hz])
    step_rows = [(1.56, -40, 140), (1.779, -31.5, 172), (2.214, -43, 161), (2.959, -31, 221),
                 (3.031, -33, 154), (3.388, -26.5, 168), (3.46, -29, 210)]
    # counter top taking the weight: (time [s], level [dB], pitch [Hz])
    thud_rows = [(7.56, -31, 94.4), (7.625, -24, 115), (7.69, -30.5, 79.5), (8.77, -41, 65)]
    # side under mid by the floor: (pitch [Hz], level [dB])
    side_hall = [(60, -29), (110, -23.5), (200, -20), (380, -13.5), (700, -8.5), (1290, -8.5), (2380, -8.5),
                 (4400, -8), (8120, -8), (15000, -7.5)]
    # side under mid at the counter: (pitch [Hz], level [dB])
    side_counter = [(60, -22.5), (110, -30), (200, -36.5), (380, -17), (700, -14.5), (1290, -13.5),
                    (2380, -13), (4400, -11), (8120, -11.5), (15000, -14)]
    fan_db, kitchen_db = -51.0, -60

    t = np.arange(N) / SR
    first = np.clip((cut_times[0] - t) / 0.016, 0, 1)
    last = np.clip((t - cut_times[1]) / 0.0021, 0, 1)
    rubbing = (slide() + hollow()) * lift_off(np.transpose(KNOCKS)[0], 0.022, 0.099)
    basket = band(band(rubbing + knocks() + grid(), 108, 19000), 100, 19000)
    # each moment keeps its own echo: what rang before a cut does not ring on
    counter = (1 - last) * room(basket * (1 - first), 0.55, 0.19, -10.0)
    counter = counter + room(basket * (t > cut_times[1] + .05), 0.75, 0.15, -7.5)
    counter = counter + steps(thud_rows, 0.18) + (1 - first) * air(kitchen_curve, kitchen_db)
    hall = first * (roller() + steps(step_rows, 0.12) + air(fan_curve, fan_db) + hum())
    side = colour(spread(hall), side_hall) + colour(spread(counter), side_counter)
    return np.array([hall + counter + side, hall + counter - side])


def record(dry):
    """A steep low-pass removes the top treble."""
    top_hz = 15900
    return signal.sosfilt(signal.ellip(10, .2, 70, top_hz, fs=SR, output="sos"), dry)


dry = scene()
out = record(dry)
generate_wav(out)
```